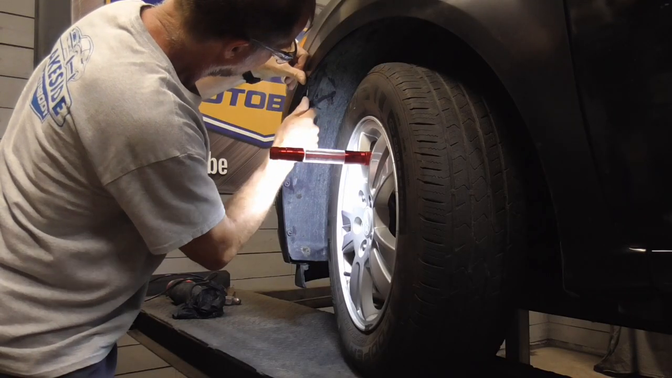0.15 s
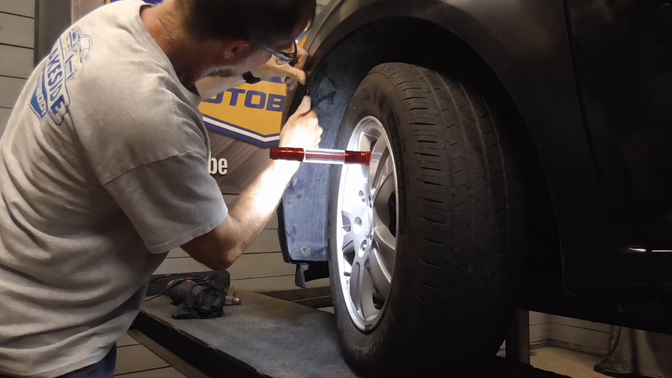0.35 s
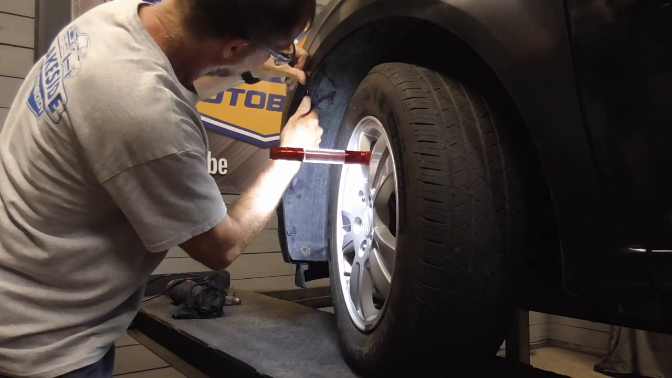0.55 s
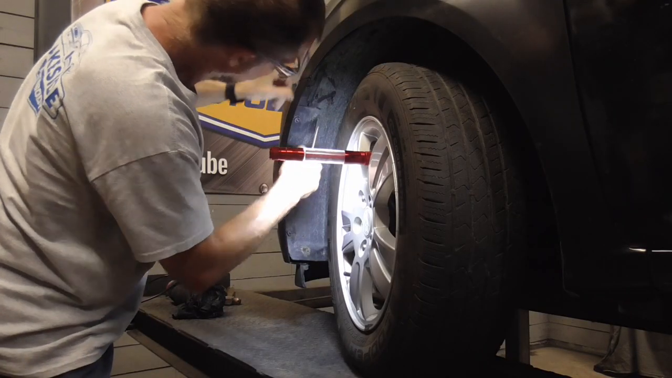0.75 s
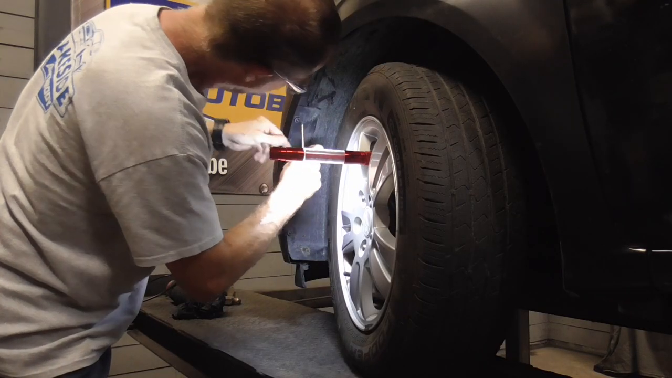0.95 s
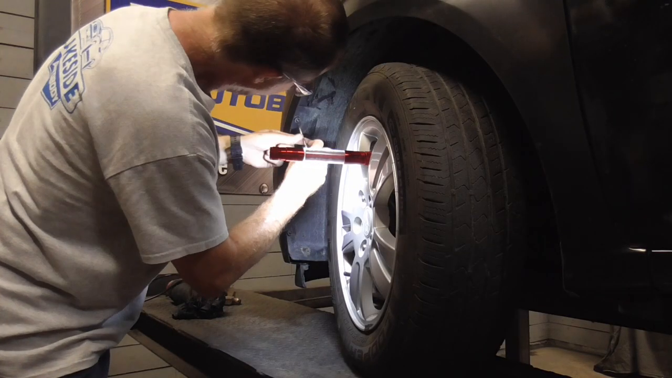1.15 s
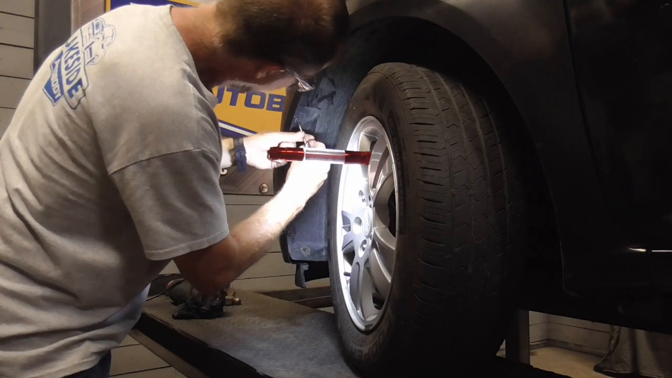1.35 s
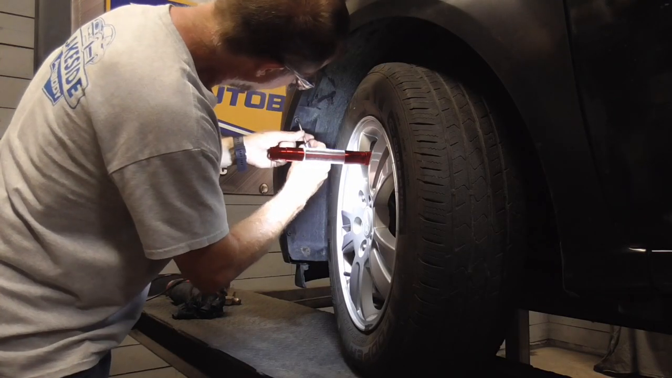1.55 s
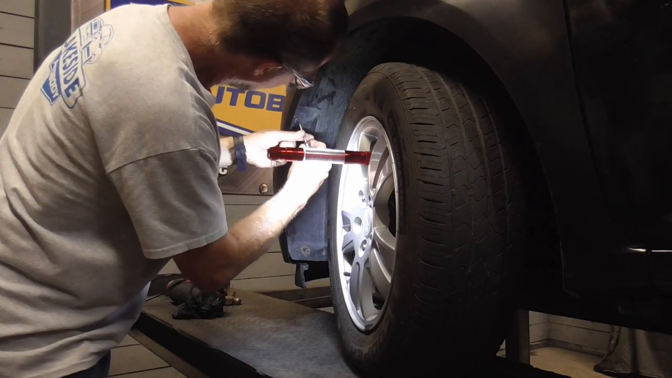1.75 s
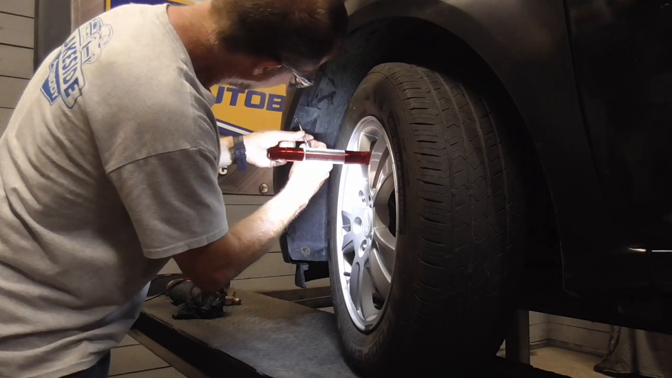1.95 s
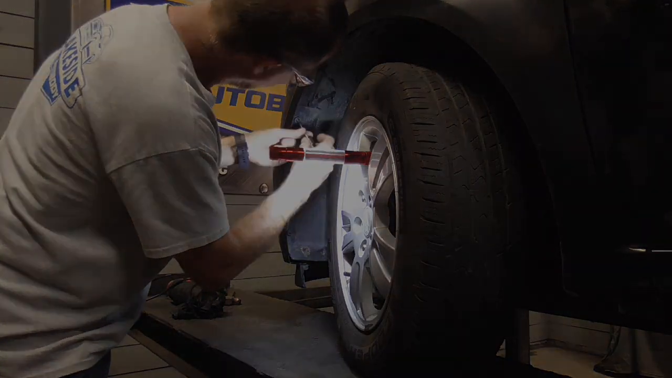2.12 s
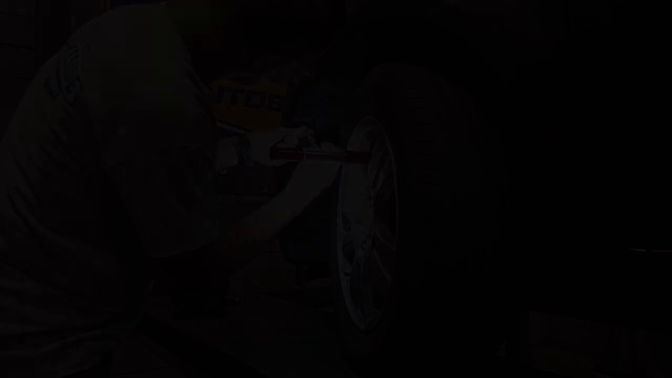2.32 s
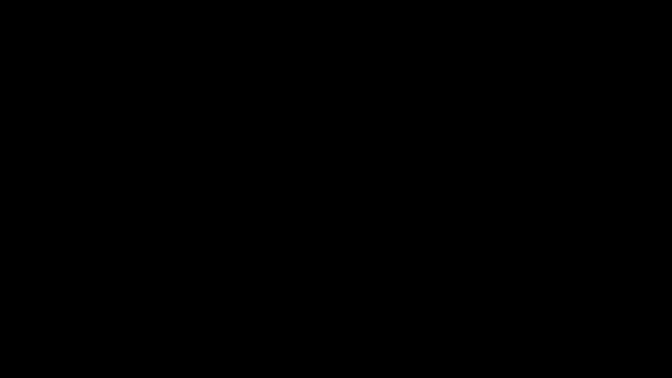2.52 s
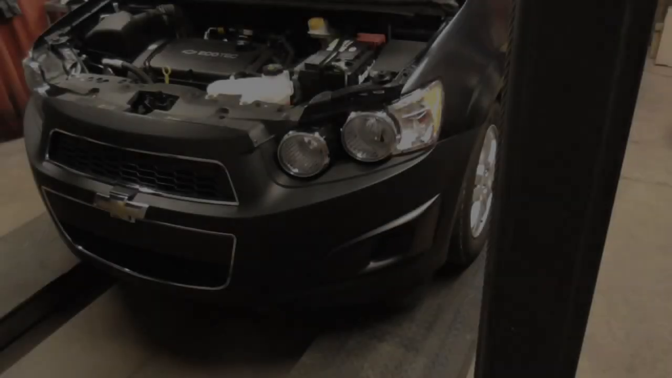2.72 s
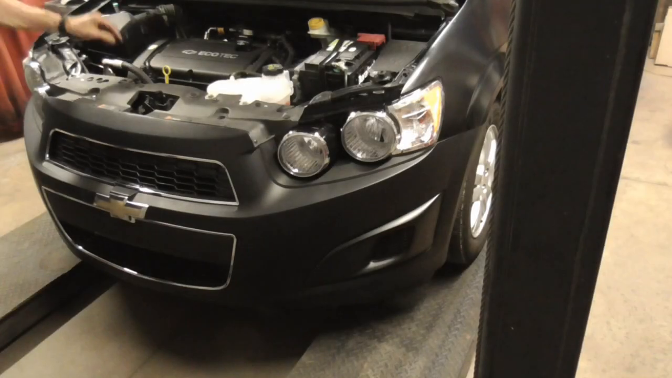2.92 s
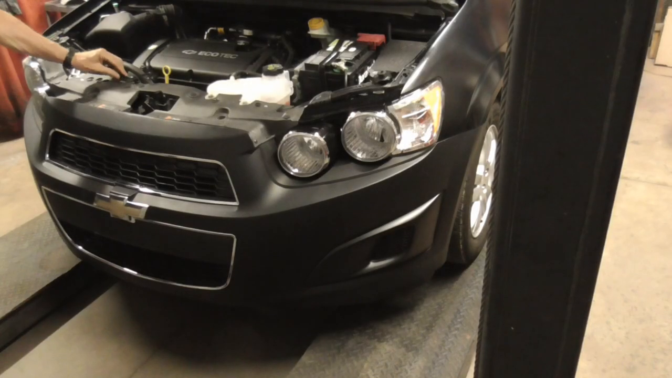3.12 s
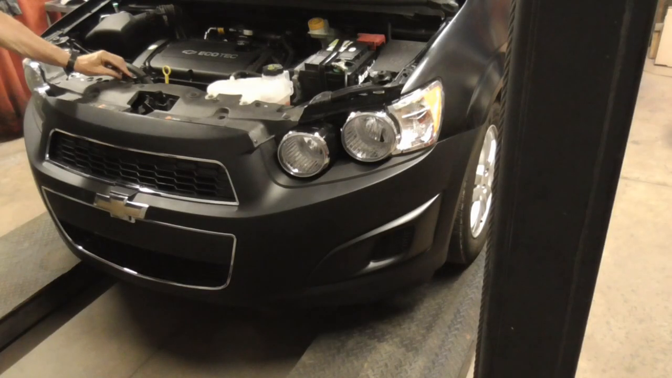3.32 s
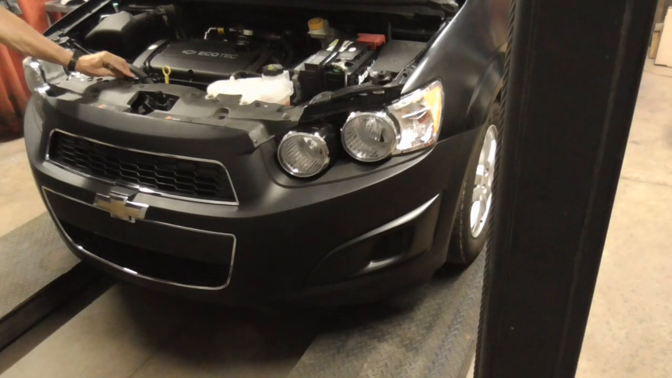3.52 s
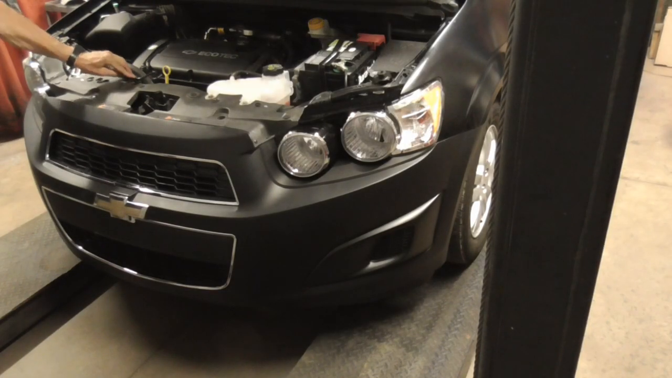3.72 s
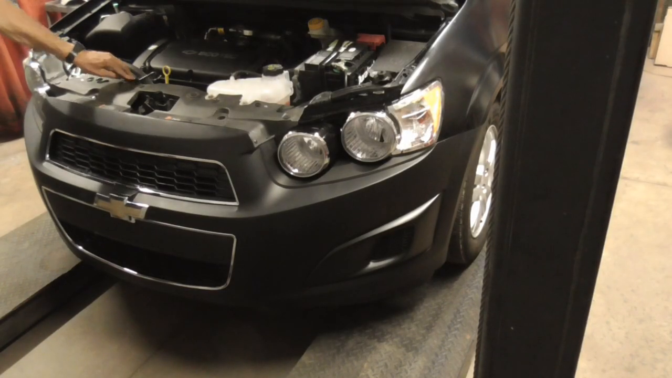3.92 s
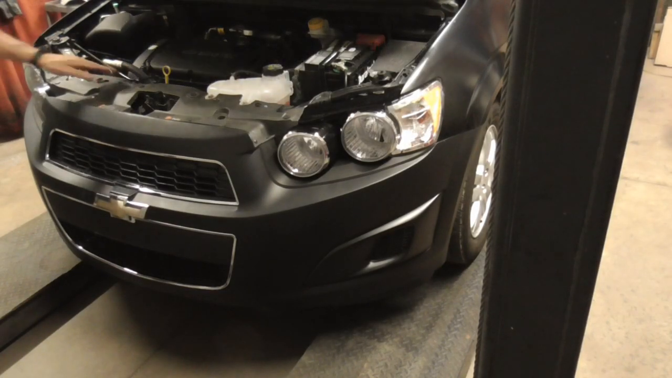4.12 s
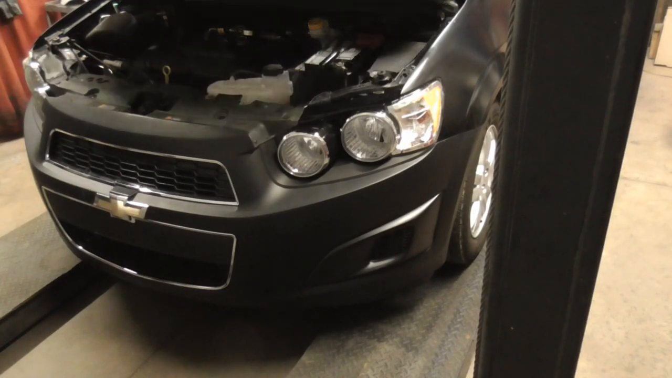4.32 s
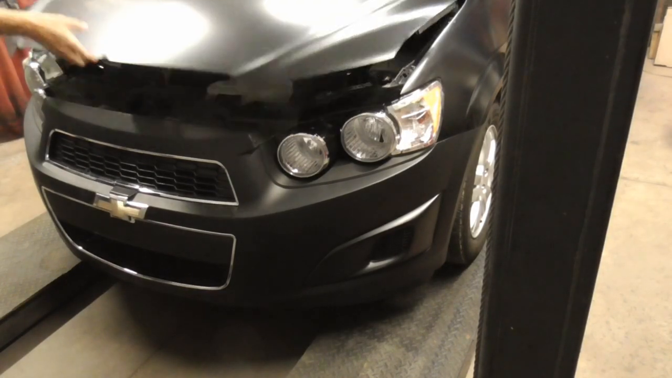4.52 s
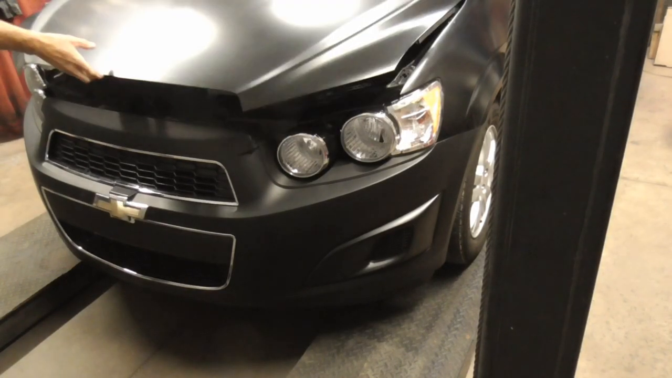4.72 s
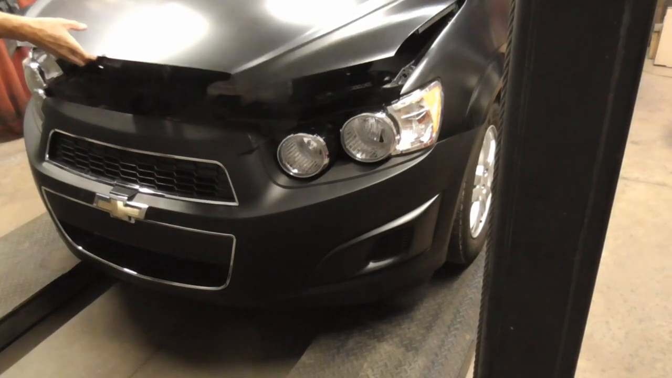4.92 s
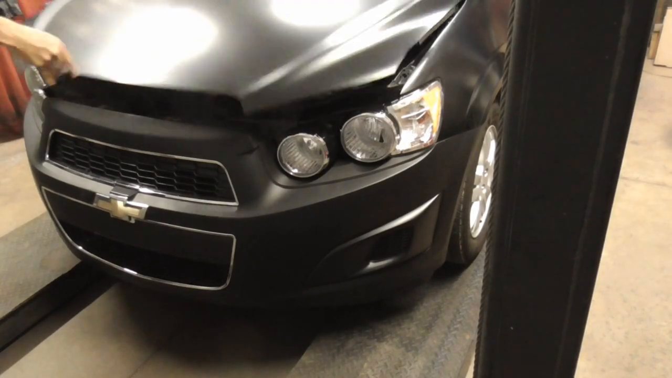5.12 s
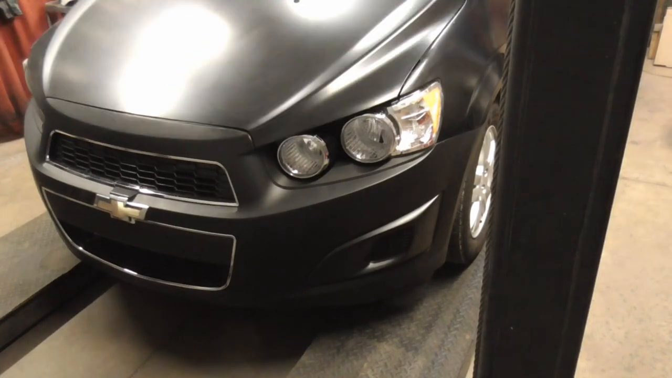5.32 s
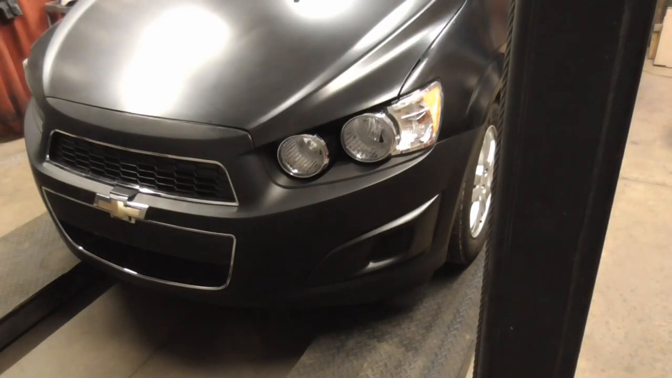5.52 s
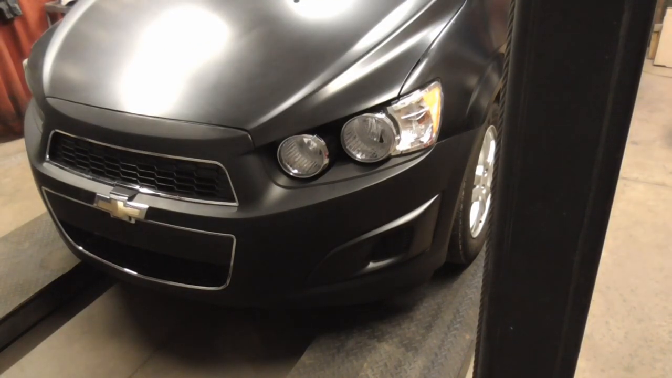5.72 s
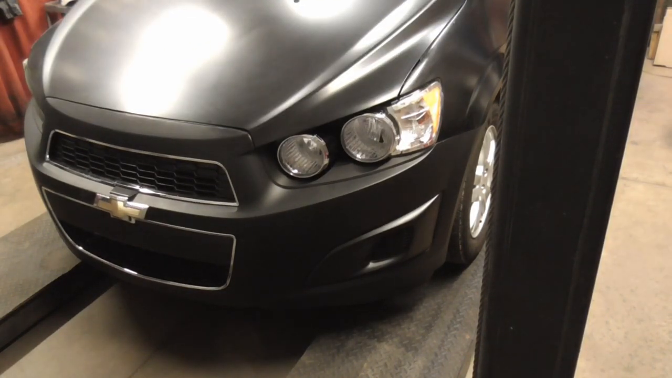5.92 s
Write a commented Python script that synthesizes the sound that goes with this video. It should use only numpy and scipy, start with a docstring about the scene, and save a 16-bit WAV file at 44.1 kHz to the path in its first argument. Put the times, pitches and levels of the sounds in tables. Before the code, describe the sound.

A car hood slams onto its latch at the end, the loudest sound in a quiet workshop. Before it come scattered light knocks on plastic over a soft, pulsing motor hum, which dies away into faint room noise. Then there are dull bumps, soft scrapes and small clicks, slightly to the left, and one sharp snap as the prop rod is stowed. Everything is heard from nearby with brief reverberation.

```python
"""A small workshop, in stereo. Two fan motors, slightly out of step, beat in a throb that fades into
steady room noise. Hands knock a plastic wheel-arch liner; then a prop rod scrapes and snaps into its
clip, and the car's hood drops on its latch. Impact and friction excite the damped normal modes of
each panel, and the room answers with diffuse reverberation."""
import sys
import numpy as np
from scipy import signal
from scipy.fft import rfft, irfft
from scipy.io import wavfile
from scipy.ndimage import uniform_filter1d

SR = 44100
rng = np.random.default_rng(int(sys.argv[2]) if len(sys.argv) > 2 else 0)


def master_out(mix):
    """Clip the mix to full scale and print it as 16-bit PCM to the path in sys.argv[1]."""
    frames = np.transpose(np.atleast_2d(mix))
    ceiling = np.clip(frames, -1, 1)
    pcm = np.round(ceiling * 32767).astype(np.int16)
    wavfile.write(sys.argv[1], SR, pcm)


N = 262395
T = np.arange(N) / SR

# beating motor tones: (frequency [Hz], level [dB], partner's level below it [dB])
MOTOR_PAIRS = [(111.1, -45, 4), (136, -55, 4)]
# drift of the throb: (time [s], beat rate [Hz])
BEAT_RATE = [(0, 4.04), (.7, 3.61), (1.25, 3.15), (1.6, 3.78), (2.3, 3.1)]
# fainter motor tones: (frequency [Hz], level [dB])
MOTOR_TONES = [(181.2, -57), (211.3, -62), (219.6, -62), (227, -81)]
# noise spectra: (frequency [Hz], relative spectral density [dB])
FAN_AIR = [(15, -64), (25, -45), (59, -12), (89, -22), (123, -2), (206, -14.5), (270, -16), (545, -30),
           (1520, -37.5), (1840, -46.5), (4740, -46), (6210, -51.5), (7710, -45.5), (13200, -42.5),
           (16000, -50)]
SHOP_AIR = [(20, -32), (40, -11), (70, -9), (120, 1), (200, -6), (400, -14), (800, -20), (1400, -26.5),
            (1900, -37), (4200, -31.5), (6200, -36), (8000, -30), (13000, -29.5), (16000, -35.5)]
TICK_SPECTRUM = [(250, -31.5), (900, 2), (1500, -7), (2100, -9.5), (2800, -15), (3600, -9), (4500, -11.5),
                 (5800, -21), (8000, -16), (12500, -18), (16000, -29)]  # small parts
LATCH_SPECTRUM = [(250, -29), (900, 3), (1400, 0.5), (2000, -18), (2600, -11.5), (3300, -4), (4100, 3.5),
                  (5000, -6.5), (6100, -7.5), (8500, -1), (10800, -4), (13100, -5), (16000, -21)]  # latch and panel edges
# stereo width of diffuse sound: (frequency [Hz], side relative to mid [dB])
SIDE_LEVEL = [(60, -11.5), (200, -11), (400, -0.5), (1300, -1), (5000, -2.5), (9000, -0.5)]
# reverberation time: (frequency [Hz], T60 [s])
ROOM_T60 = [(60, 1.1), (250, 0.5), (1000, 0.42), (4000, 0.48), (10000, 0.28)]
# a steel tool and a spring: (time [s], frequency [Hz], level [dB], T60 [s])
STEEL_RINGS = [(2.226, 11690, -43, .2), (5.32, 1061, -60, 5.)]
# panel modes: (frequency [Hz], level [dB], T60 before added damping [s])
LINER_MODES = [(173.7, -8.5, 1), (223, 7, 0.066), (324, -4.5, 0.13), (388.4, 2.5, 0.11), (438, 8.5, 0.009),
               (509.6, -12, 0.39), (600, 4.5, 0.039), (642, 0, 0.081), (837, 8.5, 0.027), (942, -7.5, 0.14),
               (1213, 8, 0.046), (1492, 4, 0.11), (2160, -6, .06), (3500, -24, .08)]
BODY_MODES = [(49.6, -18, 0.9), (99.7, -9.5, 0.55), (123.2, -4.5, 0.67), (125.9, -2, 0.43),
              (149.6, -4, 0.31), (184, -5, 0.37), (224.3, -4, 0.66), (270.6, 5.5, 0.15), (301.3, 1, 0.21),
              (386, -7, 0.14), (409.6, -2.5, 0.18), (487, -6.5, 0.19), (556, 1.5, 0.057),
              (637.8, -3, 0.094), (748, -6.5, 0.051), (824.6, -4.5, 0.15), (962, 0, 0.038),
              (1080, -17, 0.48), (1194, -13.5, 0.21), (1317, -13.5, 0.3), (1360, -34.5, .1),
              (2090, -3, 0.084), (3380, 3.5, 0.036), (4200, -14.5, 0.043)]
# hands and rod sliding: (time [s], duration [s], level [dB], favoured pitch [Hz], relative hiss [dB])
RUBS = [(0.714, .04, -58.5, 700, 3.5), (2.777, 0.105, -67, 780, -18), (2.25, 0.062, -42, 380, -21),
        (2.313, 0.17, -54.5, 720, -17), (2.908, 0.093, -51, 567, -25), (3.059, 0.071, -54.5, 520, -24),
        (3.283, 0.095, -66.5, 720, -7), (3.597, 0.19, -53, 640, -13), (3.784, 0.27, -48, 570, -12),
        (4.07, 0.2, -44, 462, -16), (4.338, 0.17, -65.5, 503, -14), (4.698, 0.058, -55, 625, -25.5),
        (5.142, 0.2, -60, 780, -4.5)]
# impacts: (time [s], level [dB], favoured pitch [Hz], relative tick [dB], rise [ms], reach [octaves])
LINER_KNOCKS = [(.005, -50, 593, -34, 4.2, 0.1), (.14, -50, 560, -15, 12, .2),
                (.215, -64, 610, 1.5, 4, 0.41), (.265, -48.5, 600, -20, 11, 0.47),
                (.295, -44, 585, -32, 5.6, 0.51), (.754, -30, 620, -14.5, 5.3, 0.31),
                (.83, -62, 500, 1, 11, 0.89), (.90, -61, 520, -4, 4.6, 0.64),
                (1.693, -35.5, 405, -22, 1.6, 0.61), (1.76, -47.5, 610, -33, 17.5, .53),
                (1.85, -45.5, 308, -40, 7.4, 0.49), (1.94, -39.5, 400, -24, 21, 0.95),
                (1.96, -32.5, 177, -20.5, 5.7, 0.19), (1.962, -28.5, 396, -27, 3.9, 0.7),
                (2.085, -42.5, 530, -25, 1.4, 0.93), (2.225, -21.5, 414, -14.5, 5.1, 0.22),
                (2.226, -32, 975, -20, 0.65, 0.39), (2.228, -31.5, 176, -49, 2.2, 0.21)]
BODY_KNOCKS = [(2.41, -36.5, 766, -17, 0.45, 1), (2.462, -21, 297, -30, 14.1, 0.36),
               (2.475, -25.5, 673, -22.5, 4.8, 0.5), (2.513, -24, 288, -40, 1.3, 0.38),
               (2.797, -54, 817, -13, 2.9, 0.24), (2.83, -51.5, 760, -11.5, 2.4, .21),
               (3.045, -41.5, 720, -28, 0.89, 0.11), (3.092, -44.5, 590, -13, 0.74, 0.5),
               (3.287, -50, 695, -22, 0.69, 0.84), (3.448, -34.5, 990, -13, 0.7, 0.36),
               (3.45, -47.5, 3540, -27, 0.58, .35), (3.462, -37, 1110, -12.5, 3.3, 0.36),
               (3.587, -41.5, 1050, -12, 1.5, 0.43), (3.658, -43.5, 900, -6, 0.96, 0.46),
               (3.675, -39, 700, -18, 4.2, 0.18), (3.826, -35, 920, -15.5, 4, 0.66),
               (3.85, -42.5, 820, -4, 0.39, 0.57), (3.946, -13, 820, -7.5, 3.8, 0.28),
               (3.949, -24, 3350, -12, 0.72, 0.69), (3.952, -17.5, 243, -14, 11.9, 0.47),
               (4.045, -26.5, 223, -33, 4.8, 0.34), (4.167, -42, 400, -10, 5.5, .87),
               (4.42, -56, 300, -7, 7.3, 0.77), (4.675, -62.5, 900, 12.5, 1.1, 0.94),
               (4.699, -42.5, 610, -12, 6, 0.25), (4.76, -50, 201.6, -21.5, 4.3, 0.41),
               (4.89, -50, 470, -30.5, 11, 0.27), (5.20, -41, 948, -18, 3.5, 0.6),
               (5.202, -52, 3620, -16, 2.5, .3), (5.225, -43, 272, -9.5, 54, 0.094),
               (5.83, -46.5, 310, -17.5, 13.4, 0.62)]
# latch, bumpers, then the panel bottoming out: (the impact columns, chatter time [ms])
HOOD_SLAM = [(5.298, -23, 590, 12, 0.28, 1.25, 1), (5.300, -24, 495, -3, 0.2, 0.75, 50),
             (5.316, -18.5, 590, 1.5, 1.4, 1.07, 9.3), (5.322, -14, 116, -14, 24, 0.38, 15),
             (5.325, -25.5, 61.3, -38, 13, .29, 18), (5.338, -17.5, 264, -16.5, 1.9, 1.2, 11),
             (5.36, -19.5, 474, -17, 1.3, 0.92, 60), (5.42, -27.5, 350, -19.5, 89, 1.54, 63.5),
             (5.5, -37, 128, -40, 15, 0.27, 11)]


def amp(db):
    """Amplitude ratio of a level in decibels."""
    return 10 ** (np.asarray(db) / 20)


def unit(x):
    """Normalisation to unit rms."""
    return x / np.sqrt(np.mean(x ** 2))


def on_log(table, hz):
    """Interpolation of (frequency, value) points on a logarithmic frequency axis."""
    freqs, values = np.transpose(table)
    return np.interp(np.log(hz + 1), np.log(freqs), values)


def noise(spectrum, size):
    """Diffuse field: stereo noise of unit rms, most coherent between channels in the bass."""
    hz = np.arange(size // 2 + 1) * SR / size
    mid, side = rfft(rng.standard_normal((2, size))) * amp(on_log(spectrum, hz))
    side = side * amp(on_log(SIDE_LEVEL, hz))
    return unit(irfft(np.array([mid + side, mid - side]), size))


def drift(rate_hz):
    """Random modulation: Gaussian values joined by linear ramps."""
    hold = int(SR / rate_hz)
    return uniform_filter1d(np.repeat(rng.standard_normal(N // hold + 1), hold), hold)[:N]


def add(out, start, sound):
    """Superposition of a sound from a start time in seconds."""
    i = int(start * SR)
    out[:, i:i + sound.shape[1]] += sound[:, :N - i]


def rings(modes):
    """Damped harmonic oscillators: the first 0.75 s of each mode's impulse response, one a row."""
    hz, db, t60 = np.transpose(modes)[:, :, None]
    t = T[:SR * 3 // 4]
    return amp(db - 60 * t / np.maximum(t60, .01)) * np.sin(2 * np.pi * hz * t)


def reach(modes, hz, octaves):
    """Selective excitation: a contact drives most the modes near its favoured pitch."""
    return np.exp(-.5 * (np.log2(np.array(modes)[:, 0] / hz) / octaves) ** 2)


def shop_air(whine_hz=2020):
    """Ambient noise: a broad spectrum and a faint whine, modulated in level and pitch."""
    whine_level = amp(-86 + 4.1 * drift(21))
    whine = whine_level * np.sin(2 * np.pi * whine_hz * np.cumsum(1 + 0.002 * drift(33)) / SR)
    return amp(-60 + drift(4.6)) * noise(SHOP_AIR, N) + whine


def fans():
    """Beats: close tones of two motors interfere, over fainter tones and the rush of air."""
    beat = 2 * np.pi * (np.cumsum(np.interp(T, *np.transpose(BEAT_RATE))) / SR + 0.55)
    phase_per_hz = 2 * np.pi * np.cumsum(1 + 0.00081 * drift(1.04)) / SR
    throb = sum(amp(db) * (np.sin(hz * phase_per_hz) + amp(-below_db) * np.sin(hz * phase_per_hz + beat))
                for hz, db, below_db in MOTOR_PAIRS)
    tones = sum(amp(db + 2 * drift(5.28)) * np.sin(hz * phase_per_hz) for hz, db in MOTOR_TONES)
    air = amp(-52 + drift(2.26)) * noise(FAN_AIR, N)
    return np.sqrt(2) * (throb + tones) + air


def room(source, gain_db=-7.5, onset_s=0.00093):
    """Reverberation: convolution with octave bands of noise, each decaying at its own rate."""
    t, tail = T[:SR], 0
    for hz in 45 * 2 ** np.arange(9):
        band = noise([(hz / 2, -30), (hz, 0), (hz * 2, -30)], SR) * np.sqrt(hz)
        tail = tail + band * amp(-60 * t / on_log(ROOM_T60, hz))
    tail *= np.minimum(t / onset_s, 1)
    tail /= np.linalg.norm(tail[0])
    return amp(gain_db) * signal.fftconvolve(tail, source.mean(axis=0)[None])[:, :N]


def steel():
    """Free vibration: a tool and a spring each ring in a single mode after a blow."""
    out = np.zeros((2, N))
    for start, *mode in STEEL_RINGS:
        add(out, start, rings([mode]))
    return out


def rubbing(attack_s=0.034, release_db_s=245, hand_damping_db_s=400):
    """Stick-slip friction: uneven slips drive the hand-damped body modes, with a hiss on top."""
    out = np.zeros((2, N))
    slips = rng.standard_normal(N) * amp(2 * drift(40))
    held = rings(BODY_MODES)[:, :SR // 4] * amp(-hand_damping_db_s * T[:SR // 4])
    driven = signal.fftconvolve(held, slips[None])[:, :N]
    hiss = noise(TICK_SPECTRUM, N) * amp(3 * drift(60))
    for start, duration, db, hz, hiss_db in RUBS:
        attack = np.clip((T - start) / attack_s, 0, 1)
        release = amp(-release_db_s * np.maximum(T - start - duration, 0))
        body = unit(reach(BODY_MODES, hz, octaves=0.63) @ driven)
        out += amp(db) * attack * release * (body + amp(hiss_db) * hiss)
    return out


def impacts(events, modes, tick_spectrum, damping_db_s, left_db, spill_db=-20.5):
    """Modal response to impact: each blow swells a panel's modes, chatters and gives a bright tick."""
    out = np.zeros((2, N))
    t, ring_t = T[:SR // 2], T[:SR * 3 // 4]
    bank = rings(modes) * amp(-damping_db_s * ring_t)
    mode_hz = np.array(modes)[:, 0]
    pan = amp(np.array([[left_db], [-left_db]]) / 2)
    dense_decay = amp(-7 - 60 * t / 0.45 - damping_db_s * t)  # T60 of 0.45 s before added damping
    for start, db, hz, tick_db, rise_ms, octaves, chatter_ms in events:
        swell = (1 - np.exp(-2000 * ring_t / rise_ms)) ** 2
        contact = swell[:len(t)] * np.exp(-1000 * t / chatter_ms)
        contact /= contact.max()
        spill = amp(spill_db) * np.minimum(hz / mode_hz, 1) ** 2  # to distant modes, less to high ones
        ring = ((reach(modes, hz, octaves) + spill) * rng.choice([-1, 1], len(modes))) @ bank
        chatter = contact * rng.standard_normal(len(t))
        rattle = signal.fftconvolve(ring, chatter / np.linalg.norm(chatter))[:len(ring)]
        ring = swell * ring + .3 * rattle
        sound = np.tile(ring / np.abs(ring).max(), (2, 1))
        # many small modes overlap into a noise band around the blow's pitch
        width = 2 ** (2 * octaves)
        band = [(hz / width / 2, -70), (hz / width, -30), (hz, 0), (hz * width, -24),
                (hz * width * 2, -60)]
        dense = noise(band, len(t)).mean(axis=0)
        sound[:, :len(t)] += octaves ** 2 * dense_decay * swell[:len(t)] * dense
        tick = noise(tick_spectrum, len(t))
        sound[:, :len(t)] += amp(tick_db) * contact * (0.41 * tick.mean(axis=0) + 0.7 * tick)
        add(out, start, amp(db) * pan * sound)
    return out


def with_chatter(knocks, base_ms=6.3, per_rise=2.7):
    """Contact duration: each knock gains a chatter time that grows with its rise time."""
    return [(*knock, base_ms + per_rise * knock[4]) for knock in knocks]


def liner_knocks():
    """Internal damping: the soft plastic liner rings only briefly when knocked."""
    return impacts(with_chatter(LINER_KNOCKS), LINER_MODES, TICK_SPECTRUM, damping_db_s=250, left_db=-1.4)


def body_knocks():
    """Contact damping: hands and prop rod strike the body while a hand absorbs its vibration."""
    return impacts(with_chatter(BODY_KNOCKS), BODY_MODES, TICK_SPECTRUM, damping_db_s=98, left_db=3)


def hood_slam():
    """Impulsive excitation: the hood hits its latch and rings, lightly damped by rubber bumpers."""
    return impacts(HOOD_SLAM, BODY_MODES, LATCH_SPECTRUM, damping_db_s=18, left_db=-1.1)


def scene():
    """Superposition of direct and reverberant sound over a crossfade from fans to room noise."""
    liner = liner_knocks()
    hands = body_knocks() + rubbing()
    hood = hood_slam()
    fan_fade = amp(1 - 3 * T - 18 * np.maximum(T - 2.05, 0))  # a slow sag, faster from 2.05 s
    shop_rise = amp(-69 * np.maximum(2.254 - T, 0))
    background = fan_fade * fans() + shop_rise * shop_air()
    # the wheel arch shields the liner from the room; the large hood radiates all round
    reverberation = room(amp(-5) * liner + hands + amp(2.5) * hood)
    work = liner + hands + hood + steel() + reverberation
    mic_low_cut = signal.butter(2, 82, "high", fs=SR, output="sos")
    return background + signal.sosfilt(mic_low_cut, work)


def record(dry, cutoff_hz=16150):
    """Band limiting: a steep low-pass filter removes the highest treble."""
    return signal.sosfilt(signal.ellip(10, .2, 80, cutoff_hz, fs=SR, output="sos"), dry)


dry = scene()
out = record(dry)
master_out(out)
```